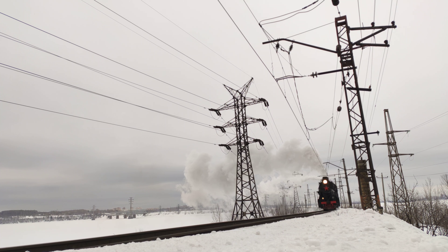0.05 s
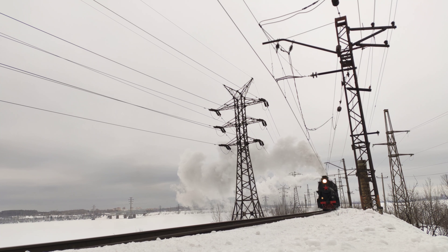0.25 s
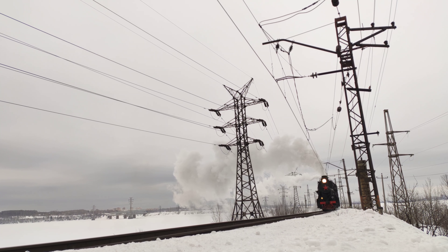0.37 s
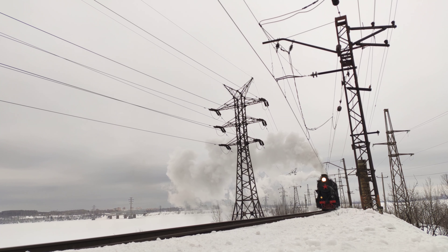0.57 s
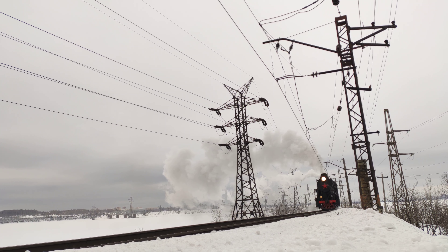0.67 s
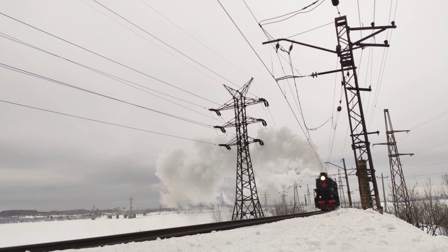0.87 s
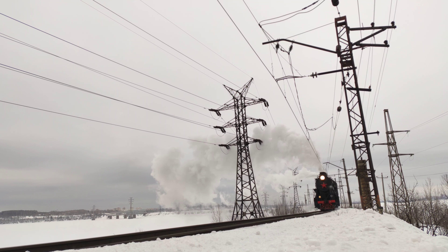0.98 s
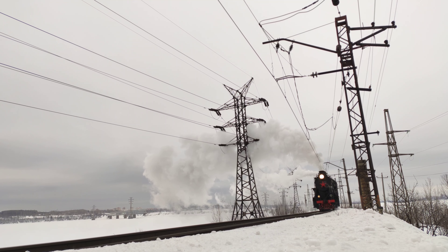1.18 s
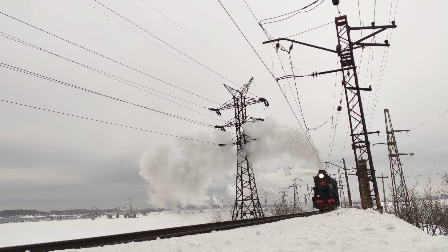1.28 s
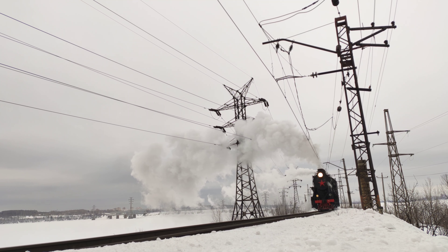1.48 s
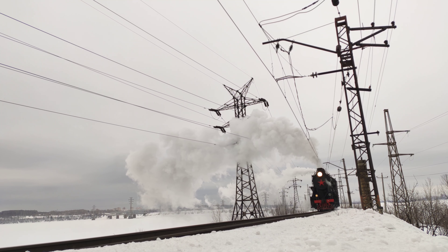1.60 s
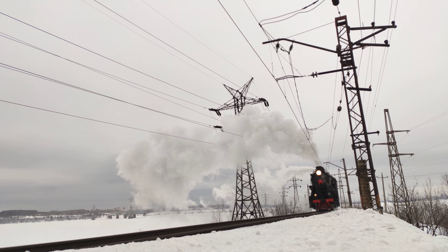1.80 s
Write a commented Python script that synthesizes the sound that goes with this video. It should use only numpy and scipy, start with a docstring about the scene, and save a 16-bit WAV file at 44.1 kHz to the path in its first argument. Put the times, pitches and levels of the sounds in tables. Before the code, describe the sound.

Steam train whistle: one breathy, wavering blast outdoors, echo lingering, then soft puffs of steam.

```python
"""A steam locomotive approaches over open snowy ground and blows one blast on a single-note whistle.
From the start wind thumps and buffets the left microphone port over the train's rumble and leaking steam.
The whistle, summed from harmonics, rises as its valve opens, with a hissing noise jet; it sags as the valve
shuts. Delayed copies, most pulled flat by the engine's motion, and a long wash of echoes linger after it.
A hollow chuff of resonant noise marks the shutting valve, and two soft noise puffs of steam follow."""
import sys
import numpy as np
from scipy import signal
from scipy.fft import rfft, irfft
from scipy.io import wavfile
from scipy.ndimage import map_coordinates

SR = 44100
rng = np.random.default_rng(int(sys.argv[2]) if len(sys.argv) > 2 else 0)


def generate_wav(signal):
    """Clip the signal to [-1, 1] and save it as 16-bit WAV at the path in sys.argv[1]."""
    frames = np.transpose(np.atleast_2d(signal))
    scaled = np.clip(frames, -1, 1) * 32767
    pcm = np.round(scaled).astype(np.int16)
    wavfile.write(sys.argv[1], SR, pcm)


N = 81585
T = np.arange(N) / SR  # s
HZ = np.maximum(np.arange(N + 1) * SR / (2 * N), 1)  # bins of the zero-padded spectrum

# stereo tilt of the engine's steam: pitch_hz, left_minus_right_db
STEAM_PAN = [(1000, -1.5), (3000, -1), (5000, -1.5), (6300, 13), (8000, 0), (14000, -0.5)]


def from_db(db):
    """Decibels to gain."""
    return 10 ** (np.asarray(db) / 20)


def rms_one(x):
    """Scale to unit power."""
    return x / np.sqrt(np.mean(x ** 2) + 1e-20)


def in_time(rows):
    """Join (time_s, value) points with straight lines."""
    return np.interp(T, *np.transpose(rows))


def swell(rows):
    """Gain through (time_s, level_db) points, all but silent outside them."""
    return from_db(np.interp(T, *np.transpose(rows), left=-140, right=-140))


def at_hz(points):
    """Join (pitch_hz, value) points on a log frequency axis."""
    hz, value = np.transpose(points)
    return np.interp(np.log(HZ), np.log(hz), value)


def shaped(x, response):
    """Filter by a frequency response."""
    return irfft(rfft(x, 2 * N) * response)[..., :N]


def drift(rate_hz):
    """Slow random wander of unit power: noise dulled above the given rate."""
    return rms_one(shaped(rng.standard_normal(N), 1 / (1 + (HZ / rate_hz) ** 2)))


def resonance(x, hz, width_hz):
    """Two-pole resonance with gain 1 on top."""
    r = np.exp(-np.pi * width_hz / SR)
    zeros = np.array([1, 0, -1]) * (1 - r * r) / 2
    poles = [1, -2 * r * np.cos(2 * np.pi * hz / SR), r * r]
    return signal.lfilter(zeros, poles, x + 1e-18)


def ports(x, pan):
    """Sound from the engine reaches the right port later; the level tilts between ports with frequency."""
    lag_s = .00015
    tilt = from_db(at_hz(pan) / 2)
    late = np.exp(-2j * np.pi * HZ * lag_s)
    return shaped(x, np.array([tilt, late / tilt]))


def rush(colour, likeness, pan, flicker_db):
    """Turbulent noise from the engine, partly alike in the two ports; each octave flickers by itself."""
    alike = np.clip(at_hz(likeness), 0, .99)
    mid_side_response = from_db(at_hz(colour)) * np.sqrt([1 + alike, 1 - alike])
    mid, side = shaped(rng.standard_normal((2, N)), mid_side_response)
    noise = rms_one(ports(np.array([mid + side, mid - side]), pan))
    octave = np.clip(np.log2(HZ / 400), 0, 5)
    flickering = 0
    for k in range(6):
        band = shaped(noise, np.maximum(1 - abs(octave - k), 0))  # overlapping triangles
        flickering = flickering + band * from_db(flicker_db * drift(21))
    return flickering


def wind():
    """A lumpy breeze on both ports; on the left, gusts with one thump amid brief buffeting."""
    # steady wind on the left port, before its lumps: time_s, level_db
    breeze = [(0, -49.5), (.25, -52.5), (.45, -41), (.6, -52), (.9, -52), (1.3, -49), (1.65, -58),
              (1.85, -52)]
    # gusts on the left port: peak_s, length_s (to 1/e on each side), thump_peak_db, thump_pitch_hz
    gusts = [(.024, .009, -27, 250), (0.096, .004, -35, 170), (0.106, .012, -31, 80),
             (0.111, .005, -31, 300), (.156, .012, -27.5, 170), (.329, .01, -30, 170),
             (0.355, .014, -24, 264), (0.377, .01, -28, 200), (.394, .012, -30, 150),
             (0.431, .025, -34, 160), (0.454, .02, -38.5, 260), (0.492, .02, -34, 100),
             (0.534, .012, -28.5, 160), (.626, .009, -35, 130), (0.695, .013, -37, 80),
             (.818, 0.019, -27, 199), (0.875, .01, -38, 70), (1.079, .023, -36.5, 200),
             (1.147, .008, -32, 230), (1.187, .004, -47, 230), (1.769, .01, -36.5, 110),
             (1.847, 0.0047, -28.5, 132)]
    breeze_top_hz, breeze_right_db, lumps_db = 161, -14.5, 3.5
    low_hz, buffet_top_hz, buffet_db = 25, 420, -10.5  # buffeting relative to the thump, before dulling
    eddy_cycles = .6  # a pressure spike between two troughs

    def low_noise(top_hz):
        """Turbulence as band-limited noise of unit power."""
        band = signal.butter(2, [low_hz, top_hz], "band", fs=SR, output="sos")
        return rms_one(signal.sosfilt(band, rng.standard_normal(N)))

    def lumpy_breeze():
        """Low noise whose level wanders around the breeze curve."""
        return from_db(in_time(breeze) + lumps_db * drift(33)) * low_noise(breeze_top_hz)

    left, right = lumpy_breeze(), lumpy_breeze()
    buffets = from_db(buffet_db) * shaped(low_noise(buffet_top_hz), 1 / (1 + 1j * HZ / 700))
    for peak_s, length_s, db, hz in gusts:
        cycles = (T - peak_s) * hz
        thump = np.cos(2 * np.pi * cycles) * np.exp(-(cycles / eddy_cycles) ** 2)
        burst = buffets * np.exp(-((T - peak_s) / length_s) ** 2)
        left = left + from_db(db) * (thump + burst)
    return np.array([left, from_db(breeze_right_db) * right])


def train():
    """Rumble and leaking steam grow slowly as the engine nears, over a steady hollow boom of running gear."""
    # relative spectrum of the rolling train: pitch_hz, density_db
    colour = [(25, 8.5), (60, 0), (110, -14), (155, -8), (220, 4), (350, 1), (600, -1), (1100, -3.5),
              (2200, -6), (4000, -8), (6200, -12), (7500, -23.5), (10300, -24.5), (11500, -32.5),
              (14500, -30.5)]
    # stereo tilt: pitch_hz, left_minus_right_db
    pan = [(100, 1.5), (500, 0.5), (2000, 1.5), (4000, 2.5), (6400, 10), (8000, 0.5)]
    # how alike the ports are: pitch_hz, likeness (0 to 1)
    likeness = [(50, 1), (350, 1), (800, 0.43), (1500, 0.6), (3300, 0.8), (6000, 0.081), (13000, 0.79)]
    start_db, rise_db_per_s, flicker_db = -48, 0.96, 1.3
    drone_hz, drone_width_hz, drone_db = 144.2, 15, -58.5
    boom = resonance(rng.standard_normal(N), drone_hz, drone_width_hz)
    drone = from_db(drone_db) * rms_one(boom)
    approach = from_db(start_db + rise_db_per_s * T)
    return drone + approach * rush(colour, likeness, pan, flicker_db)


def steam():
    """Turbulent noise: the whistle's hissing jet and the soft puffs that follow it."""
    # level of the jet before flicker: time_s, level_db
    jet_level = [(.2, -65), (.33, -53.5), (.44, -46.5), (.58, -47), (.74, -52.5), (.9, -47.5),
                 (1.18, -47.5), (1.27, -53), (1.33, -51), (1.44, -51.5)]
    # relative spectrum of the jet: pitch_hz, density_db
    jet_colour = [(500, -26), (1000, 8), (2000, 12), (3200, 7), (5000, 16.5), (6300, 11.5), (7800, 0.5),
                  (10300, -3.5), (11500, -49), (14000, -5.5)]
    # soft puffs before flicker: start_s, length_s (start to release), level_db
    puff_rows = [(1.394, 0.13, -45.5), (1.74, .14, -54)]
    # relative spectrum of the puffs: pitch_hz, density_db
    puff_colour = [(1000, 19), (3200, 8), (4400, 24.5), (6000, 24), (7100, 21.5), (8300, 4.5), (10400, 3.5),
                   (11500, -13), (14000, -25)]
    # how alike the ports are: pitch_hz, likeness (0 to 1)
    likeness = [(500, 0.45), (1500, 0.98), (3200, 0.74), (5500, 0.22), (9000, 0.14), (13000, 0.84)]
    attack_s, release_s = 0.024, 0.067
    jet = swell(jet_level) * rush(jet_colour, likeness, STEAM_PAN, flicker_db=3.24)
    puff_gain = 0
    for start_s, length_s, db in puff_rows:
        attack = np.clip((T - start_s) / attack_s, 0, 1)
        release = np.exp(-np.maximum(T - start_s - length_s, 0) / release_s)
        puff_gain = puff_gain + from_db(db) * attack * release
    return jet + puff_gain * rush(puff_colour, likeness, STEAM_PAN, flicker_db=.8)


def chuff():
    """A short hollow puff as the valve shuts: noise through two equal resonances."""
    start_s, level_db, hz, width_hz = 1.336, -41, 1173, 180
    attack_s, decay_s = .016, .022
    age = np.maximum(T - start_s, 0)
    envelope = np.minimum(age / attack_s, 1) * np.exp(-np.maximum(age - attack_s, 0) / decay_s)
    hollow = resonance(resonance(rng.standard_normal(N), hz, width_hz), hz, width_hz)
    return ports(from_db(level_db) * envelope * rms_one(hollow), STEAM_PAN)


def whistle():
    """A stopped pipe: a clean note with a strong third harmonic, brighter as it is blown harder."""
    # the note before jitter: time_s, pitch_hz
    pitch = [(.2, 750), (.266, 792), (.31, 810), (.36, 821), (.48, 821.5), (.58, 824.5), (.85, 821),
             (.96, 815), (1.22, 810), (1.265, 785), (1.3, 769), (1.35, 755)]
    # levels before flutter, fundamental, second and third harmonic: time_s, level_db
    tone = [(.2, -55.5), (.228, -37), (.295, -28), (.34, -30.5), (.44, -33.5), (.52, -29), (.74, -33),
            (.815, -25.5), (.87, -34), (.915, -27), (.958, -34.5), (1.0, -28), (1.045, -31.5),
            (1.085, -27.5), (1.12, -27), (1.17, -25.5), (1.25, -32), (1.28, -33.5), (1.335, -34.5),
            (1.355, -39.5)]
    second = [(.25, -59), (.32, -51), (.48, -51), (.55, -44.5), (.9, -47.5), (.955, -42), (1.0, -48),
              (1.2, -45.5), (1.27, -63), (1.33, -71)]
    third = [(.225, -74), (.255, -43.5), (.35, -40.5), (.49, -37), (.6, -32.5), (.69, -39), (.745, -32.5),
             (.79, -43), (.94, -32), (.99, -41.5), (1.055, -32.5), (1.11, -43), (1.18, -39), (1.212, -32.5),
             (1.285, -45.5), (1.335, -42)]
    # common level of the higher overtones: time_s, level_db
    brass = [(.24, -70), (.278, -49), (.37, -48), (.43, -41), (.53, -41), (.7, -49), (.77, -48),
             (.86, -48.5), (1.0, -47.5), (1.06, -41.5), (1.12, -51.5), (1.205, -38.5), (1.255, -55.5),
             (1.33, -58)]
    # higher overtones: multiple, level_db (relative to brass)
    overtones = [(4, 1), (5, 0.5), (6, -2.5), (7, -11), (8, -21.5)]
    jitter, jitter_hz = .0016, 70  # share of the pitch, rate
    flutter_db, flutter_hz = .55, 55  # turbulent air on the way; the dB grow with the multiple
    brightening = .07  # extra dB per dB of effort for each multiple above the fifth
    wavering_hz = in_time(pitch) * (1 + jitter * drift(jitter_hz))
    phase = 2 * np.pi * np.cumsum(wavering_hz) / SR
    effort_db = in_time(brass) - in_time(brass).max()
    levels = [(1, swell(tone)), (2, swell(second)), (3, swell(third))]
    for multiple, db in overtones:
        k = round(multiple)
        colour_db = db + brightening * (multiple - 5) * effort_db
        levels.append((k, swell(brass) * from_db(colour_db)))
    note = 0
    for k, level in levels:
        flutter = from_db(flutter_db * k * drift(flutter_hz))
        note = note + level * flutter * np.sin(k * phase + rng.uniform(0, 2 * np.pi))
    return np.sqrt(2) * note  # levels are RMS


def reflection(x, delay_s, drop):
    """The engine runs at the listener but not at the reflector: with a positive drop the echo lags and flattens."""
    return map_coordinates(x, [(T - delay_s - drop * T) * SR], order=2)


def scatter(x, t60_s, delay_s, cut_hz):
    """A dying swarm of dull outdoor echoes: sparse random impulses, dulled above the cut."""
    sparse = rng.random(N) < 900 / SR  # about 900 echoes per second
    echoes = rng.standard_normal(N) * sparse * (T > delay_s) * from_db(-60 * T / t60_s)
    echoes = echoes / np.sqrt(np.sum(echoes ** 2) + 1e-20)
    return shaped(x, rfft(echoes, 2 * N) / np.sqrt(1 + (HZ / cut_hz) ** 4))


def landscape(x):
    """Direct sound, slightly flat reflections from ground and masts, single echoes and a wash from the woods."""
    # stereo tilt of the whistle: pitch_hz, left_minus_right_db
    pan = [(820, 1.1), (1640, 1), (2460, 2.86), (4100, 3.5), (4900, 4.5), (5750, 9), (6600, 14)]
    # near reflections, the overtones scatter more: pitch_hz, level_db
    near_colour = [(800, -14.5), (1640, -8), (2400, -2.5), (3300, 0), (4100, -1), (5000, -1.5)]
    # single echoes, flattest from behind the engine:
    # delay_s (at time zero), doppler_drop (share of the pitch), level_db (before air loss)
    echo_rows = [(.045, .047, -18.5), (.24, -.003, -17), (.52, .04, -23), (.64, .012, -20)]
    near_fade_db = 7  # the flattest near reflections are about this much weaker
    air_loss_db = 6  # per kHz and second of starting delay
    drops = np.linspace(.006, .03, 18)  # Doppler drop, share of the pitch
    near = 0
    for drop in drops * rng.uniform(.9, 1.1, len(drops)):
        fade = from_db(-near_fade_db * drop / drops[-1])
        near = near + fade * reflection(x, rng.uniform(.002, .022), drop)  # delay in s
    near = shaped(near / np.sqrt(len(drops)), from_db(at_hz(near_colour)))
    echoes = 0
    for delay_s, drop, db in echo_rows:
        air = from_db(db - air_loss_db * delay_s * HZ / 1000)
        echoes = echoes + shaped(reflection(x, delay_s, drop), air)
    wash = [scatter(x, t60_s=3.1, delay_s=.05, cut_hz=2400) for _ in range(2)]  # one per port
    return ports(x + near + echoes, pan) + from_db(-27) * np.array(wash)


def scene():
    """Everything at the two ports."""
    return wind() + train() + steam() + chuff() + landscape(whistle())


def record(dry):
    """A steep low-pass cuts the top."""
    cutoff_hz = 14400
    low_pass = signal.ellip(10, .1, 70, cutoff_hz, fs=SR, output="sos")
    return signal.sosfilt(low_pass, dry)


dry = scene()
out = record(dry)
generate_wav(out)
```